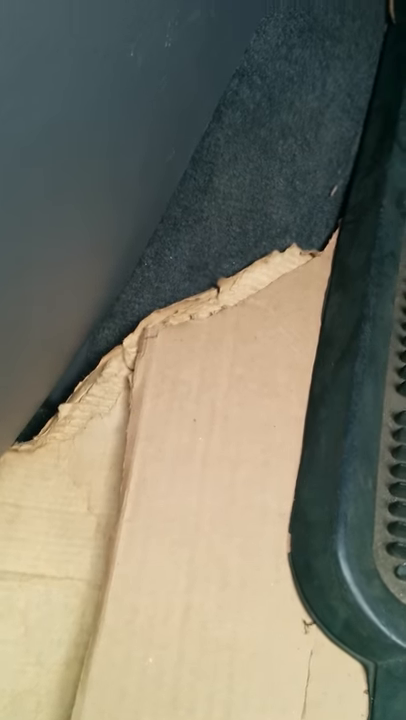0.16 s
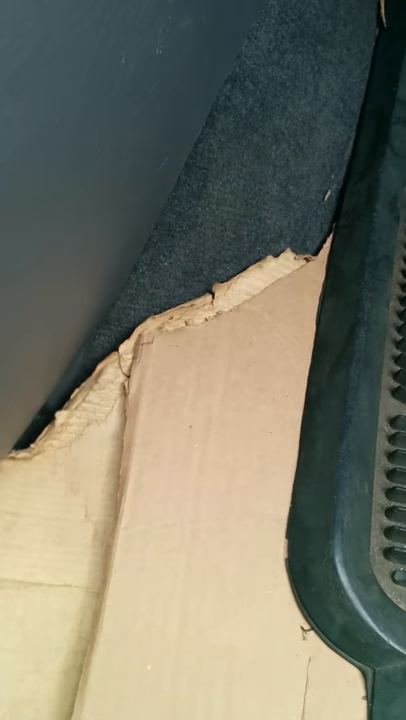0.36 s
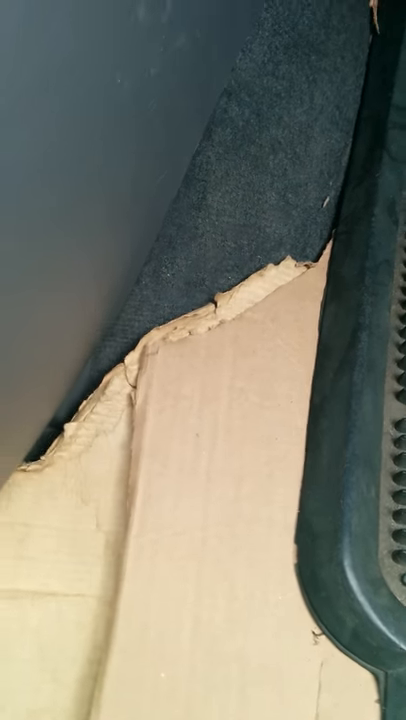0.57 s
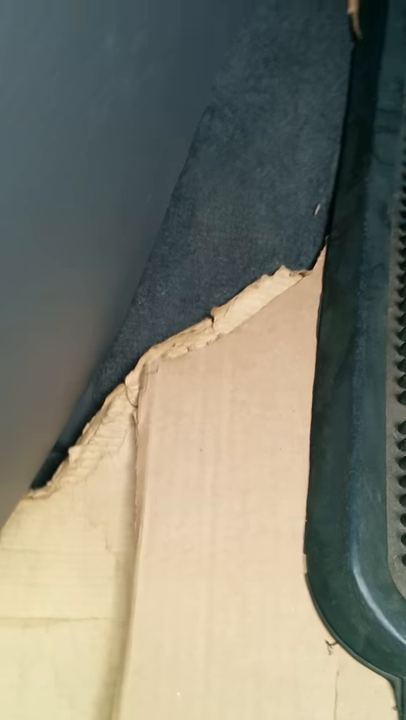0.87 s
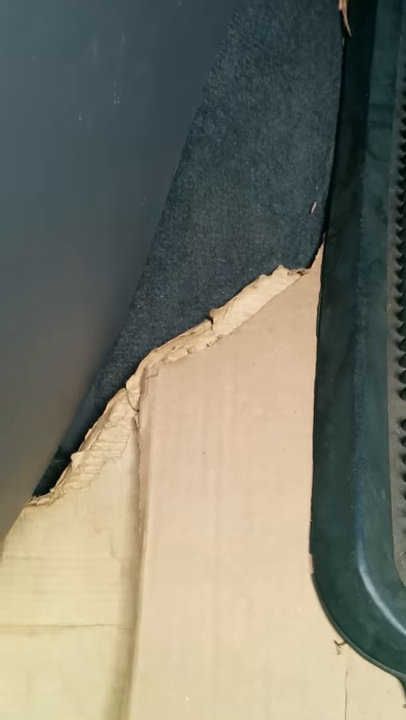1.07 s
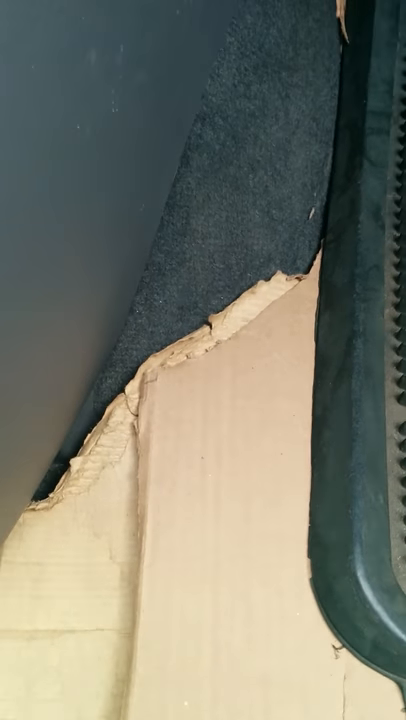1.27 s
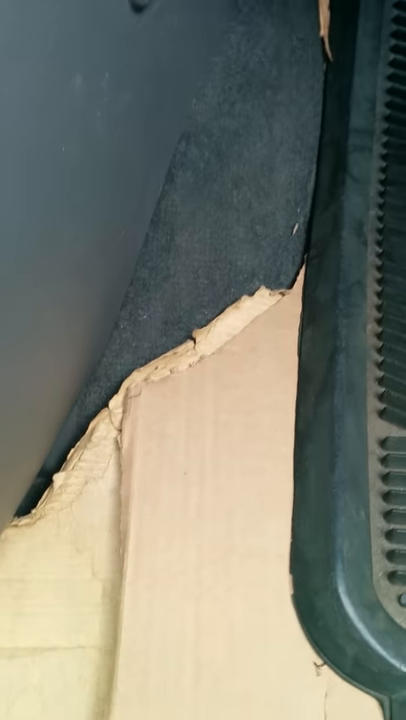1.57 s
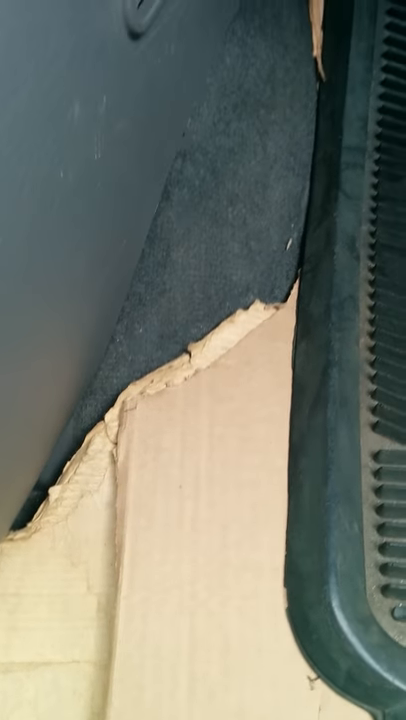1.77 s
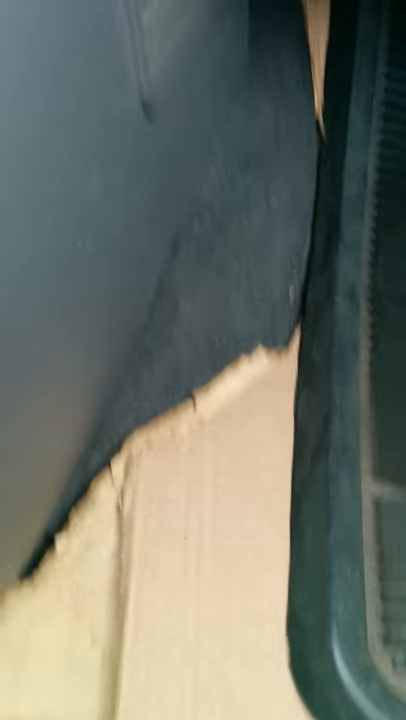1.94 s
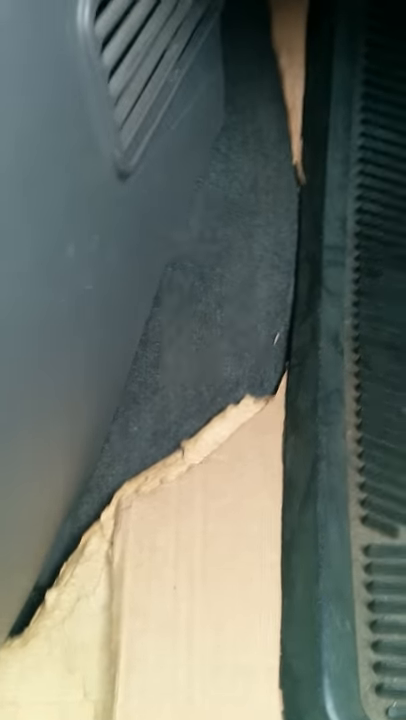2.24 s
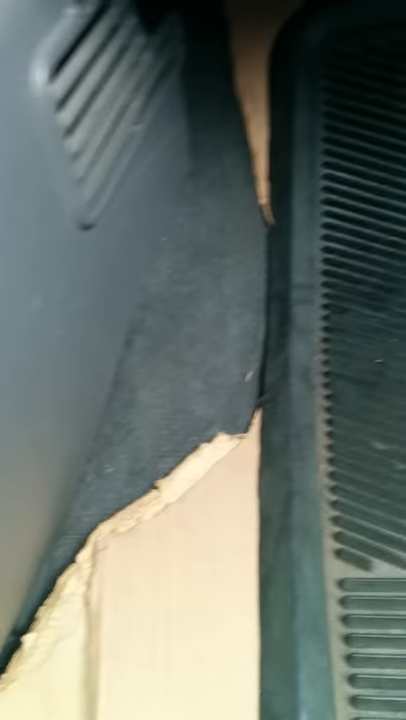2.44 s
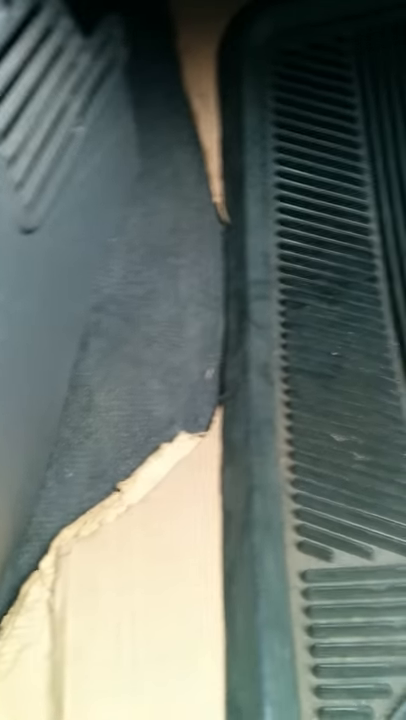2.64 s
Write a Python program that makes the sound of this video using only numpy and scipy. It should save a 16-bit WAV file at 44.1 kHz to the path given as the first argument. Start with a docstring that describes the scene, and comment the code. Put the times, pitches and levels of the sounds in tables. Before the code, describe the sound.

Loose metal part knocking rapidly over the low engine boom and rumble inside a van

```python
"""Inside a van near the floor: boom, hum, rumble and a knocking loose metal part.
A low noisy cabin boom near 50 Hz wanders by chance, drawn here as one sine with listed level and pitch.
Orders of a shaft turning about 17.5 times a second hum as wavering sines, through shaped noise of the
body and floor panels and a hiss. Loose metal knocks at listed times, mostly a turn apart: bursts of
chatter drive fixed resonances, and the low modes also sound as smooth tones."""
import sys
import numpy as np
from scipy import signal
from scipy.io import wavfile

SR = 44100
rng = np.random.default_rng(int(sys.argv[2]) if len(sys.argv) > 2 else 0)


def transcribe(u):
    """Save the signal u as a 16-bit wav file named by the first command-line argument.

    u: samples, shape (n,) or (channels, n), limited to [-1, 1]; the rate is SR.
    q: integer samples, one column per channel.
    """
    v = np.clip(np.atleast_2d(u).T, -1, 1)
    q = np.round(v * 32767).astype(np.int16)
    wavfile.write(sys.argv[1], SR, q)


def to_linear_factor(level_db):
    """Convert decibel levels (scalar or array-like) to linear amplitude factors."""
    exponent = np.asarray(level_db, float) / 20
    return 10 ** exponent


N = 123921

# Shaft speed: (time [s], speed [turns per s])
SHAFT_SPEED = [(0, 17.45), (.6, 17.55), (1.3, 17.5), (2.0, 17.68), (2.81, 17.66)]
# Cabin boom: (time [s], relative level [dB])
BOOM_LEVEL = [(0.0, -32), (0.02, -23), (0.14, -12), (0.25, -20), (0.29, -11), (0.33, -21), (0.5, -14),
              (0.56, -24), (0.59, -13), (0.7, -25), (0.73, -14), (0.93, -13), (1.03, -19), (1.06, -32),
              (1.09, -19), (1.2, -9), (1.24, -19), (1.27, -14), (1.52, -20), (1.55, -12), (1.65, -15),
              (1.74, -32), (1.78, -14), (1.83, -11), (1.89, -19), (2.02, -13), (2.13, -21), (2.36, -19),
              (2.39, -27), (2.51, -10), (2.55, -18), (2.62, -10), (2.66, -20), (2.81, -15)]
# Cabin boom: (time [s], frequency [Hz])
BOOM_PITCH_HZ = [(0.0, 55.3), (0.2, 46.4), (0.4, 45), (0.52, 50), (0.8, 46), (0.97, 53), (1.1, 46),
                 (1.49, 52.7), (1.6, 48.5), (2.27, 54.7), (2.81, 50.6)]
# Shaft orders: (multiple of shaft speed, relative level [dB])
HUM_ORDERS = [(6, -27), (8, -36.5), (9, -34.5), (11, -28.5), (12, -32), (20, -47.5), (24, -41.5),
              (27, -41.5)]
# Slow level course: (time [s], rumble [dB], bass [dB]); only departures from the mean count
ROAR_LEVEL = [(0.0, -29.5, -22.5), (0.73, -27, -24), (1.35, -31.5, -25), (1.57, -29, -17.5),
              (2.1, -31.5, -23), (2.81, -31, -23)]
# Panel noise: (frequency [Hz], relative density [dB per Hz])
RUMBLE_SPECTRUM = [(30, -23), (39, 1.5), (55, -8), (70, -1.5), (95, -19.5), (115, 2), (136, -21.5),
                   (175, -13), (205, -12.5), (274, -17), (400, -23.5), (490, -22.5), (600, -29),
                   (2500, -49.5), (5500, -100)]
# Treble of running gear and microphone: (frequency [Hz], relative density [dB per Hz])
HISS_SPECTRUM = [(1060, 2.5), (1800, -3.5), (3070, -13), (4200, -10.5), (5080, -16.5), (5820, -14),
                 (15600, -19)]
# Knocks, relative levels: (time [s], ring [dB], thud [dB], dull [dB], middle [dB], bright [dB])
KNOCK_LEVELS = [(0.0308, -36, -25.5, -29.5, -41, -44), (0.0883, -36.5, -25.5, -32, -42, -50),
                (0.1461, -28, -25, -30, -41, -39), (0.2044, -39, -25, -29.5, -48, -58),
                (0.2613, -34.5, -22.5, -32, -35.5, -40), (0.3197, -37.5, -29, -33, -44, -49),
                (0.3837, -38, -40, -32.5, -47, -47), (0.4345, -37, -27, -28, -41.5, -46),
                (0.5536, -35.5, -32, -32, -41, -54), (0.606, -30.5, -27, -29.5, -35.5, -37.5),
                (0.6644, -36, -21.5, -29, -42, -54), (0.7208, -28, -26, -25.5, -39, -40.5),
                (0.7781, -38, -24.5, -28.5, -41.5, -50), (0.8354, -35.5, -40, -27, -36, -42.5),
                (0.8927, -36, -24.5, -26.5, -44, -48), (0.9486, -38, -20.5, -29, -45, -50),
                (1.006, -55, -27, -30.5, -70, -63), (1.0435, -43, -36, -33, -48, -55),
                (1.0595, -41, -24, -34, -46, -53), (1.1817, -45, -26.5, -62, -65, -57),
                (1.2571, -39, -25, -37, -43, -45), (1.300, -57, -36, -53, -61, -59),
                (1.4152, -50, -33, -35, -52, -56), (1.528, -59, -59, -39, -66, -55),
                (1.585, -57, -43, -46, -65, -57), (1.644, -53, -62, -61, -68, -55),
                (1.6968, -28, -28, -27.5, -36.5, -34.5), (1.758, -42, -25, -29, -43, -48),
                (1.8088, -36.5, -23, -29.5, -42, -47), (1.8683, -46, -28, -38, -50, -57),
                (1.926, -45, -42, -34, -54, -51), (1.9809, -39, -62, -61, -48, -49),
                (2.0887, -46, -40, -38, -53, -55), (2.152, -46, -46, -67, -58, -50)]
# Modes of the loose part, low to high group: (frequency [Hz], width [Hz], relative level [dB])
THUD_MODES = [(708.6, 26, 1), (487.4, 38, -0.5), (518, 69, -6.5), (894, 8.9, -11)]
DULL_MODES = [(1201, 87, -4), (1374, 31.5, 0), (1517, 75, -1), (1061, 83, -5.5), (925, 111, -7)]
MIDDLE_MODES = [(1850, 3900, -20.5), (2913, 81, 4.5), (3132, 89, 4.5), (3990, 3500, -12)]
RING_MODES = [(4690, 220, -1), (5180, 294, 2), (5370, 330, 4.5), (6630, 1800, -9)]
BRIGHT_MODES = [(7740, 1300, 1.5), (10100, 570, 3), (11250, 330, 3.5), (13100, 1950, -1.5),
                (14400, 2700, -10.5)]


def evened(x):
    """Scales to rms 1."""
    return x / np.sqrt(np.mean(x ** 2) + 1e-20)


def curve(table, column):
    """A column of a time table, interpolated at every sample."""
    rows = np.array(table)
    return np.interp(np.arange(N) / SR, rows[:, 0], rows[:, column])


def slow_drift(top_hz):
    """Random drift of rms 1: slow sines, weaker as they get faster."""
    t_s = np.arange(0, N + 64, 64) / SR
    f_hz = np.geomspace(.3, top_hz, 20)[:, None]
    sines = np.sin(2 * np.pi * (f_hz * t_s + rng.random((len(f_hz), 1))))
    drift = evened((sines / np.sqrt(f_hz)).sum(0))
    return np.interp(np.arange(N) / SR, t_s, drift)


def turns():
    """Shaft turns made so far: the integral of its speed."""
    return np.cumsum(curve(SHAFT_SPEED, column=1)) / SR


def rumble_change_db():
    """Departure of the rumble level from its mean."""
    level_db = curve(ROAR_LEVEL, column=1)
    return level_db - level_db.mean()


def bass_change_db():
    """Departure of the bass level from its mean, reduced to 0.8."""
    level_db = curve(ROAR_LEVEL, column=2)
    return 0.8 * (level_db - level_db.mean())


def boom():
    """A low noisy boom near 50 Hz, wandering by chance; drawn as one sine with listed level and pitch."""
    trim_db = -0.33
    phase_turns = np.cumsum(curve(BOOM_PITCH_HZ, column=1)) / SR
    return np.sqrt(2) * to_linear_factor(trim_db + curve(BOOM_LEVEL, column=1)) * np.sin(2 * np.pi * phase_turns)


def hum():
    """Shaft orders as sines that waver in level and phase; the upper ones are tied to the turn."""
    waver_db, waver_hz, slip_rad = 1.6, 5, .35
    bass_below_order = 9.5  # lower orders follow the bass, the others the rumble
    beat_turn = 0.1523  # point of the turn at which the upper orders beat together
    total = np.zeros(N)
    for order, order_db in HUM_ORDERS:
        low = order < bass_below_order
        change_db = bass_change_db() if low else rumble_change_db()
        level_db = order_db + change_db + waver_db * slow_drift(waver_hz)
        cycles = order * (turns() - beat_turn) + low * rng.random()
        total += np.sqrt(2) * to_linear_factor(level_db) * np.sin(2 * np.pi * cycles + slip_rad * slow_drift(waver_hz))
    return total


def shaped_noise(spectrum):
    """Gaussian noise of a given spectrum, rms 1, built from overlapping frames."""
    frames, hz = N // 512 + 5, np.fft.rfftfreq(2048, 1 / SR)
    real, imaginary = rng.standard_normal((2, len(hz), frames))
    f_hz, density_db = np.transpose(spectrum)
    gain = to_linear_factor(np.interp(np.log(hz + 1), np.log(f_hz + 1), density_db))
    noise = signal.istft((real + 1j * imaginary) * gain[:, None], nperseg=2048, noverlap=1536)[1]
    return evened(noise[1024:N + 1024])


def rumble():
    """Body and floor panel noise, throbbing once per turn above the bass, plus a steady hiss."""
    rumble_db, hiss_db, bass_hz = -18, -42, 170
    throb_db, throb_turn, follows = 0.5, 0.064, 0.65
    noise = shaped_noise(RUMBLE_SPECTRUM)
    bass = signal.sosfiltfilt(signal.butter(2, bass_hz, fs=SR, output="sos"), noise)
    pulse_db = throb_db * np.cos(2 * np.pi * (turns() - throb_turn))
    upper = to_linear_factor(follows * rumble_change_db() + pulse_db) * (noise - bass)
    body = to_linear_factor(bass_change_db()) * bass + upper
    return to_linear_factor(rumble_db) * body + to_linear_factor(hiss_db) * shaped_noise(HISS_SPECTRUM)


def resonate(x, hz, width_hz):
    """One fixed resonance of peak gain about 1: a complex one-pole filter."""
    r = np.exp(-np.pi * width_hz / SR)
    return 2 * signal.lfilter([1 - r], [1, -r * np.exp(2j * np.pi * hz / SR)], x).real


def part(drive, rattle, modes, shape_s, column, part_db, clean=0, lead_s=0):
    """Each knock gates chatter into one mode group; a clean share swells as smooth tones instead."""
    scatter_db, detune_share = 1.0, 0.008
    rise_s, hold_s, t60_s = shape_s
    t_s = np.arange(SR // 8) / SR
    burst = np.minimum(t_s / rise_s, 1) * to_linear_factor(-60 * np.maximum(t_s - rise_s - hold_s, 0) / t60_s)
    rows = np.array(KNOCK_LEVELS)
    scatter, detune, phase = rng.standard_normal((3, len(modes), len(rows)))
    at = np.round((rows[:, 0] - lead_s) * SR).astype(int)
    # rms of the whole group under steady drive
    scale = np.sqrt(sum(to_linear_factor(2 * db) * np.mean(resonate(drive, hz, w) ** 2) for hz, w, db in modes))
    out = np.zeros(N + len(t_s))
    for k, (hz, width_hz, mode_db) in enumerate(modes):
        size = to_linear_factor(rows[:, column] + part_db + mode_db + scatter_db * scatter[k])
        hits = np.zeros(N)
        hits[at] = size
        bursts = signal.oaconvolve(hits, burst)[:N]
        contact = (1 - clean) * bursts + to_linear_factor(mode_db) * rattle
        out[:N] += (-1) ** k * resonate(contact * drive, hz, width_hz) / scale
        if clean:
            tone_hz = hz * (1 + detune_share * detune[k][:, None])
            tones = np.sin(2 * np.pi * (tone_hz * t_s + phase[k][:, None]))
            np.add.at(out, at[:, None] + np.arange(len(t_s)), clean * size[:, None] * burst * tones)
    return out[:N]


def chatter():
    """Many small uneven contacts of random sign, smeared by noise."""
    contacts_per_s, spread_db, smear = 780, -1, 0.8
    sizes = to_linear_factor(spread_db * np.minimum(rng.exponential(1, N), 4))
    ticks = sizes * (rng.random(N) < contacts_per_s / SR)
    return (1 - smear) * evened(ticks * rng.choice([-1, 1], N)) + smear * rng.standard_normal(N)


def with_strikes(drive):
    """Adds two harder contacts inside each knock."""
    delays_s, strike_db = [.004, .0128], [16, 21]
    strikes = np.round((np.array(KNOCK_LEVELS)[:, :1] + delays_s) * SR).astype(int)
    struck = drive.copy()
    struck[strikes] += to_linear_factor(strike_db + 2 * rng.standard_normal(strikes.shape))
    return struck


def rattle_change_db():
    """The faint rattle that goes on between knocks throbs once per turn, wavers, follows the rumble."""
    throb_db, throb_turn, waver_db, waver_hz, follows = 1, .97, 1.2, 5.38, 0.49
    pulse_db = throb_db * np.cos(2 * np.pi * (turns() - throb_turn))
    return pulse_db + waver_db * slow_drift(waver_hz) + follows * rumble_change_db()


def knocks():
    """The loose part rings in five mode groups; hard strikes reach only the middle and ring groups."""
    drive = chatter()
    struck = with_strikes(drive)
    change_db = rattle_change_db()
    thud, dull, middle, ring, bright = (to_linear_factor(db + change_db) for db in (-37, -40.5, -54, -54, -70))
    clean = .85  # smooth share of the thud
    # shapes: (rise [s], hold [s], t60 [s]); the thud leads the treble slightly
    return (part(drive, thud, THUD_MODES, (0.01, 0.016, 0.09), column=2, part_db=-5,
                 clean=clean, lead_s=0.00615)
            + part(drive, dull, DULL_MODES, (0.008, 0.008, 0.09), column=3, part_db=-3.5, clean=clean ** 2)
            + part(struck, middle, MIDDLE_MODES, (0.005, 0.009, 0.12), column=4, part_db=-4)
            + part(struck, ring, RING_MODES, (0.0035, 0.011, 0.12), column=1, part_db=-7)
            + part(drive, bright, BRIGHT_MODES, (0.0025, 0.008, 0.09), column=5, part_db=-0.5))


def scene():
    """All sources at one microphone."""
    return (boom() + hum() + rumble() + knocks())[None]


def roll_off(x):
    """The treble ends steeply here."""
    return signal.sosfilt(signal.butter(12, 15710, fs=SR, output="sos"), x)


def record(dry):
    """Low cut at 28 Hz."""
    low_cut = signal.butter(2, 28, "high", fs=SR, output="sos")
    mix = signal.sosfilt(low_cut, dry)
    return roll_off(mix)


dry = scene()
out = record(dry)
transcribe(out)
```